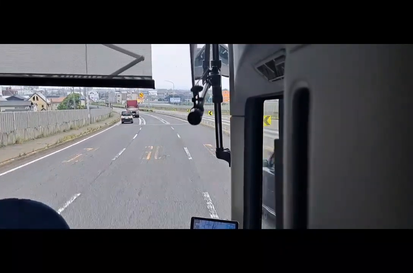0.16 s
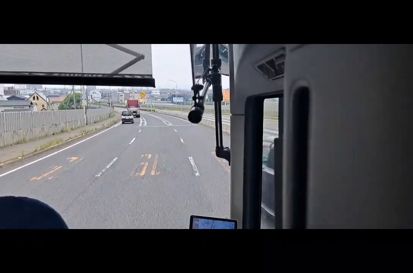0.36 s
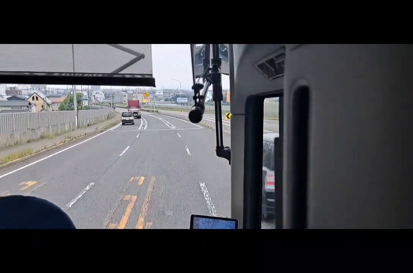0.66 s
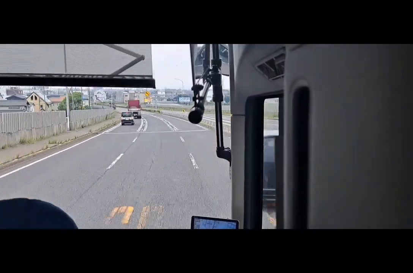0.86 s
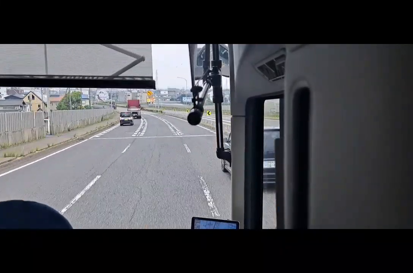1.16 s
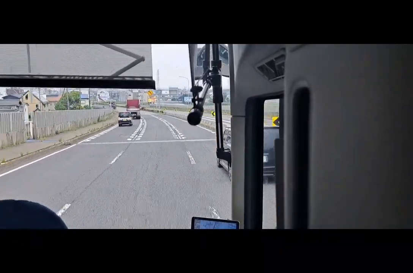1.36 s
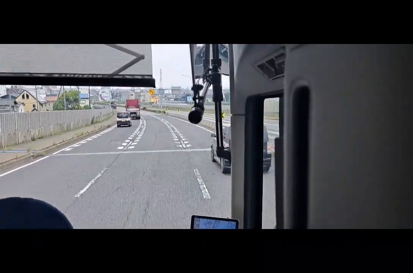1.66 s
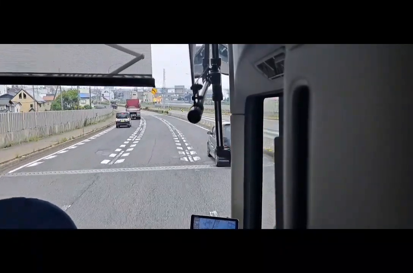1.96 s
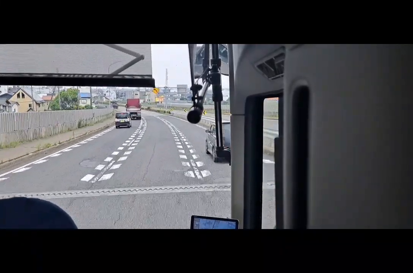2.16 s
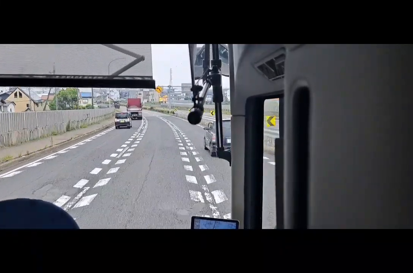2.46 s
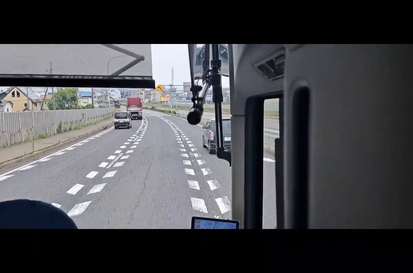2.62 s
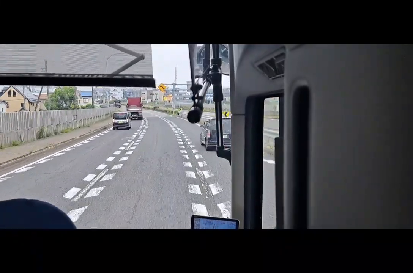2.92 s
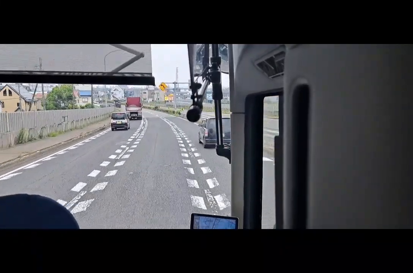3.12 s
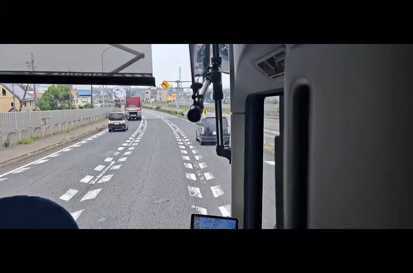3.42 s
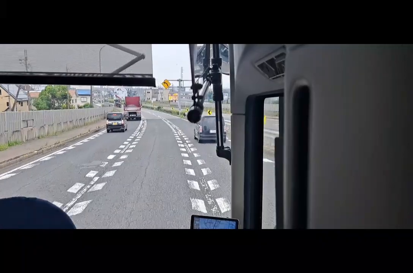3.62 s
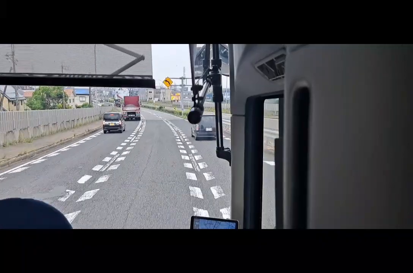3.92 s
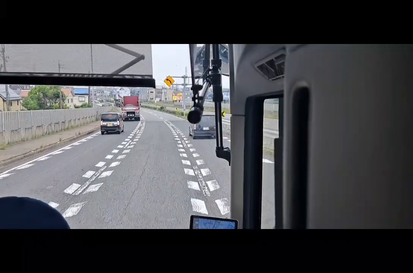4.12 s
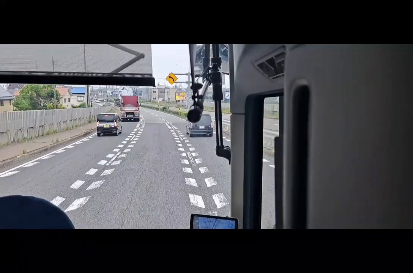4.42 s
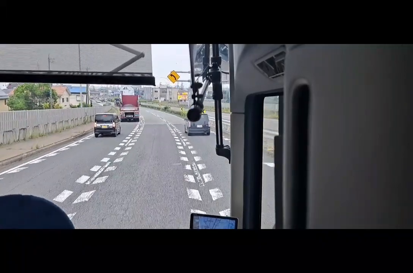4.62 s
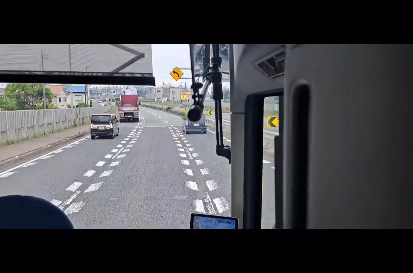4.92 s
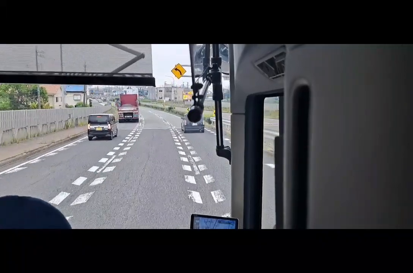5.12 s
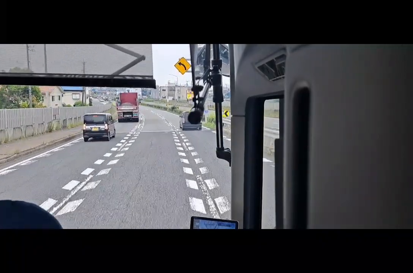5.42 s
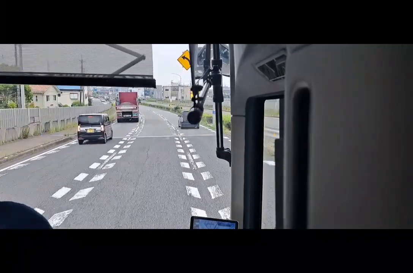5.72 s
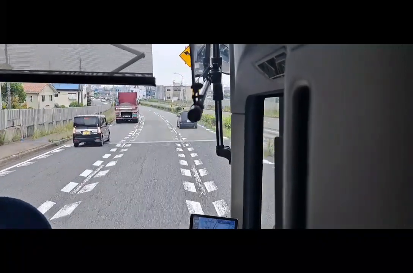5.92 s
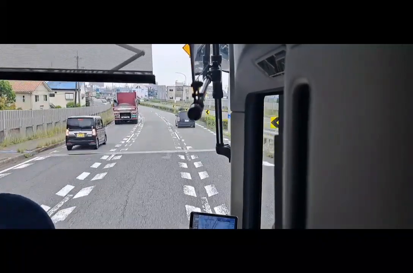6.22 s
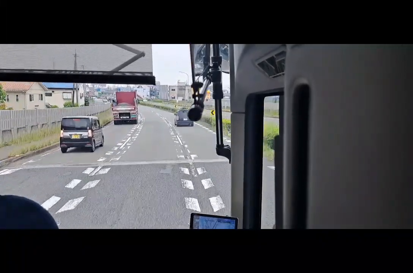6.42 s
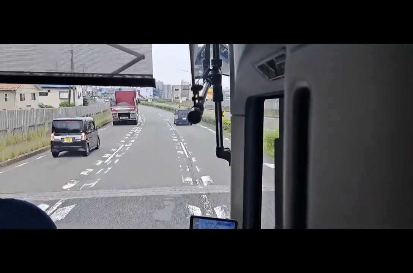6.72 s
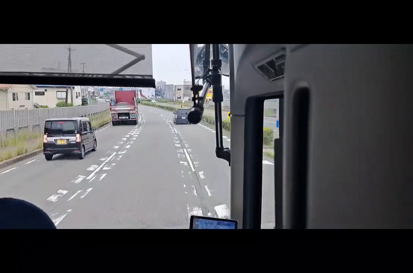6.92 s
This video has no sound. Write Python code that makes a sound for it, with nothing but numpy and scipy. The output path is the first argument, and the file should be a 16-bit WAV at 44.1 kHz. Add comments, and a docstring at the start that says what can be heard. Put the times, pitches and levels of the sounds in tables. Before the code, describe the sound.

A stereo microphone inside a moving coach picks up deep bassy body boom, a distant rear engine and soft tyre noise. Over it, dry plastic trim chatters quickly and irregularly, each swing a gritty rustle with a fluttering squeak. Knocks cluster early, just after three seconds and again after five. The chatter nearly rests in between, and brief thin rubber chirps appear in the second half.

```python
"""Coach cabin from a front seat

Stereo microphone in a front seat as a coach cruises along a main road, the diesel low at the far rear.
Engine and body notes are wavering sines; tyres, vents and body resonances are shaped noise.
Loose trim rocks about ten times a second, some swings harder than others: every swing rustles
in grains of noise and rubs with a fluttering squeak. Knocks and ticks are struck modes that die away;
now and then a rubber seal chirps, an unsteady tone with its octave."""
import sys
import numpy as np
from scipy import signal
from scipy.fft import rfft, irfft, next_fast_len
from scipy.io import wavfile
from scipy.ndimage import uniform_filter1d

SR = 44100
rng = np.random.default_rng(int(sys.argv[2]) if len(sys.argv) > 2 else 0)


def file_out(sig):
    """Save sig as 16-bit WAV at sys.argv[1]."""
    # one column per channel
    cols = np.atleast_2d(sig).T
    # limit, then scale
    lim = np.clip(cols, -1, 1)
    pcm = np.round(lim * 32767).astype(np.int16)
    wavfile.write(sys.argv[1], SR, pcm)


N = 311787
TIME = np.arange(N) / SR


def from_db(db):
    """Decibels to gain."""
    return 10 ** (np.asarray(db) / 20)


def rms_one(x):
    """Scale to unit power."""
    return x / np.sqrt(np.mean(x ** 2) + 1e-20)


def in_time(rows):
    """Each column of a curve at every sample."""
    seconds, *columns = np.transpose(rows)
    return [np.interp(TIME, seconds, column) for column in columns]


def at_hz(points, hz):
    """Read a spectrum on a log-frequency axis."""
    point_hz, value = np.transpose(points)
    return np.interp(np.log(hz + 1), np.log(point_hz), value)


def pan(left_db):
    """Gains of the two channels; left_db is left minus right, so negative leans right."""
    return from_db(np.array([[left_db], [-left_db]]) / 2)


def drift(rate):
    """Random wander with spread 1, heading for a new value rate times a second."""
    return rms_one(np.interp(TIME * rate, np.arange(16384), rng.standard_normal(16384)))


# Likeness of the two channels in the cabin.
# Each row: frequency in Hz, likeness from -1 (opposed) to 1 (the same).
CHANNEL_LIKENESS = [(60, 0.97), (140, 0.98), (220, 0.87), (330, 0.51), (500, 0.27), (770, 0.47),
                    (1170, -0.24), (1800, -0.28), (2700, 0.11), (6000, 0.00051)]
# Balance of the cabin noise. Each row: frequency in Hz, left minus right in dB.
CHANNEL_BALANCE = [(250, 0), (330, -1), (500, 1), (1100, -1.5), (1750, -9), (2300, 5), (2800, 2), (4000, 0),
                   (5000, -2.5), (7000, -0.5), (10000, 2), (14000, -1.5)]


def cabin_noise(spectrum=None):
    """Stereo noise, nearly alike in both channels in the bass and diffuse in the treble."""
    size = next_fast_len(N)
    hz = np.arange(size // 2 + 1) * SR / size
    mid, side = rfft(rng.standard_normal((2, size)))
    alike = np.clip(at_hz(CHANNEL_LIKENESS, hz), -1, 1)
    ears = np.array([[1], [-1]])
    both = np.sqrt(1 + alike) * mid + np.sqrt(1 - alike) * side * ears
    both = both * from_db(ears * at_hz(CHANNEL_BALANCE, hz) / 2)
    colour = 1 if spectrum is None else from_db(at_hz(spectrum, hz))
    return rms_one(irfft(both * colour, size)[:, :N])


def even_out(sound, even_s):
    """Divide by the running level of both channels together, taken over even_s."""
    power = uniform_filter1d(np.mean(sound ** 2, axis=0), int(even_s * SR) + 1)
    return sound / np.sqrt(power + 1e-20)


def resonate(modes, even_s):
    """Steep resonances driven by noise, their joint level evened over even_s."""
    out, drives = 0, (cabin_noise(), cabin_noise())
    reach = 1.167  # the outer band spans hz / reach to hz * reach
    for k, (hz, width, db) in enumerate(modes):
        band = signal.butter(1, [hz - width / 2, hz + width / 2], "band", fs=SR, output="sos")
        skirt = signal.butter(1, [hz / reach, hz * reach], "band", fs=SR, output="sos")
        out = out + from_db(db) * signal.sosfilt(np.vstack([band, skirt]), drives[k % 2])
    return even_out(out, even_s)


def droning(modes, even_s, steady, wander_hz):
    """Resonances with a share of clean, slowly wandering note on the first mode."""
    note_hz = modes[0][0] + wander_hz * drift(3)
    note = np.sqrt(2) * np.sin(2 * np.pi * (np.cumsum(note_hz) / SR + rng.random()))
    out = np.sqrt(steady) * note + np.sqrt(1 - steady) * resonate(modes, even_s)
    return even_out(out, even_s)


# Low orders of the diesel. Each row: multiple of the firing rate, relative level in dB.
ENGINE_ORDERS = [(2, -35), (2.5, -34), (3, -43.5), (3.5, -42.5), (5, -51.5), (7, -57)]
# Pace of the diesel. Each row: time in seconds, firing rate in Hz before its small jitter.
FIRING_RATE = [(0, 46.84), (2.8, 47.27), (4.6, 46.59), (7.07, 45.11)]
# Drone at the firing rate. Each row: time in seconds, relative level in dB.
DRONE_LEVEL = [(0.0, -26), (0.36, -30), (0.88, -31), (1.84, -34), (2.4, -28), (2.88, -27.5), (3.08, -37),
               (3.77, -30.5), (4.93, -30), (5.13, -21), (6.73, -31.5), (7.07, -29.5)]


def engine(level_db, drone_gain_db, waver_db, jitter):
    """Low orders of the diesel at an easing cruise, wavering as the body flexes."""
    firing_hz = in_time(FIRING_RATE)[0] * (1 + jitter * drift(6))
    turn = 2 * np.pi * np.cumsum(firing_hz) / SR
    orders = np.zeros(N)
    for k, db in ENGINE_ORDERS:
        phase = 2 * np.pi * rng.random()
        orders += from_db(db + waver_db * drift(6.5)) * np.sin(k * turn + phase)
    drone_db = in_time(DRONE_LEVEL)[0] + drone_gain_db + waver_db * drift(7)
    return np.sqrt(2) * (from_db(level_db) * orders + from_db(drone_db) * np.sin(turn))


# The road surface. Each row: time in seconds, wheel shudder in dB, relative tyre roar in dB.
SURFACE = [(0, -56, -37.5), (.7, -37, -35), (1.2, -42, -40), (2, -53, -37.5), (2.2, -28, -35.5),
           (2.5, -37, -36), (3.1, -35, -36), (3.35, -24.5, -35.5), (3.55, -27, -38), (3.8, -51, -42),
           (4.8, -46, -43), (5, -39, -41), (5.15, -32, -36), (5.5, -42, -36.5), (5.85, -32, -36),
           (6.35, -40, -37.5), (7.07, -36, -39)]
# Wheels on their springs, then the body and its large, middle and small panels.
# Each row: resonance in Hz, width in Hz, relative level in dB.
SHUDDER_MODES = [(25.2, 7.2, 0)]
BODY_MODES = [(58.9, 6.1, 1), (66.2, 6.3, -14)]
LARGE_PANELS = [(95.76, 7.7, 0)]
MIDDLE_PANELS = [(114.86, 6.9, 0)]
SMALL_PANELS = [(135.9, 11, 1), (148.7, 11.7, 0), (237, 32, -14.5)]
# How hard the road drives the body and each set of panels.
# Each row: time in seconds, relative level in dB.
BOOM = [(0.0, -22.5), (0.16, -28), (0.32, -16), (0.68, -20.5), (0.8, -19.5), (0.88, -29), (1.28, -27),
        (2.24, -23), (2.68, -28), (3.04, -19.5), (3.36, -23), (3.48, -32), (4.69, -30.5), (6.05, -31.5),
        (6.25, -25.5), (6.69, -30.5), (7.07, -40)]
LARGE_DRUMMING = [(0.0, -28), (0.4, -24.5), (0.52, -31), (0.72, -24), (1.24, -32.5), (2.12, -29.5),
                  (2.48, -24.5), (2.96, -25), (3.81, -37.5), (5.17, -33), (5.33, -21.5), (6.05, -27.5),
                  (7.07, -29)]
MIDDLE_DRUMMING = [(0.0, -29.5), (0.36, -22), (0.96, -31), (2.04, -32), (2.28, -27), (2.4, -44),
                   (2.56, -16.5), (2.68, -28.5), (3.16, -23.5), (3.36, -36), (4.21, -32), (4.69, -37.5),
                   (5.13, -28), (5.41, -26.5), (5.77, -16), (6.17, -37), (7.07, -29)]
SMALL_DRUMMING = [(0.0, -26.5), (0.838, -32), (0.92, -34.5), (1.32, -28.5), (1.96, -35), (2.16, -26.5),
                  (3.28, -26.5), (3.4, -35), (5.01, -37), (5.17, -23), (5.37, -28.5), (6.13, -26.5),
                  (6.49, -31), (7.07, -31.5)]
# Spectrum of the tread's roar. Each row: frequency in Hz, relative density in dB per Hz.
TYRES = [(30, 0), (120, 7), (160, 0.5), (176, 3.5), (235, 6), (272, -2.5), (320, 3.5), (395, -2.5),
         (435, -1.5), (510, -6.5), (630, -6.5), (900, -13.5), (1300, -17.5), (2200, -26), (3200, -37),
         (14000, -56)]


def road(boom_gain_db, drum_gain_db, roar_gain_db, flutter_db, surge_db):
    """The road drives wheels, body and panels, each swelling in its own time; the tread roars above."""
    shudder_db, roar_db = in_time(SURFACE)
    shudder = from_db(shudder_db) * resonate(SHUDDER_MODES, even_s=0.18)
    boom_db = in_time(BOOM)[0] + boom_gain_db + surge_db * drift(11.0)
    boom = from_db(boom_db) * droning(BODY_MODES, even_s=0.11, steady=0.39, wander_hz=1.46)
    panels = (
        (droning(LARGE_PANELS, even_s=0.073, steady=0.36, wander_hz=1.8), LARGE_DRUMMING),
        (droning(MIDDLE_PANELS, even_s=0.09, steady=0.58, wander_hz=1.627), MIDDLE_DRUMMING),
        (resonate(SMALL_PANELS, even_s=0.078), SMALL_DRUMMING))
    drum = 0
    for sound, curve in panels:
        drum = drum + from_db(in_time(curve)[0] + drum_gain_db + surge_db * drift(14)) * sound
    roar = from_db(roar_db + roar_gain_db + flutter_db * drift(40)) * cabin_noise(TYRES)
    return (shudder + boom + roar) * pan(-1.0) + drum


# Spectrum of the ventilation. Each row: frequency in Hz, relative density in dB per Hz.
VENTS = [(300, 9), (900, 9.5), (1250, 5.5), (1500, 8.5), (1800, 3), (2200, -16.5), (2900, -26.5),
         (5000, -24), (12000, -43)]


def ventilation(level_db):
    """Steady hiss of moving air, well over to the right."""
    return from_db(level_db) * cabin_noise(VENTS) * pan(-9.0)


def slides(strokes, rise_s, stall_db, bite_db):
    """Each swing takes hold, slides and stalls ever faster, until the next takes over."""
    swing_s = 0.11  # age at which the swing has lost stall_db
    envelope = np.zeros(N)
    for s, db in strokes:
        span = slice(int(s * SR), int(s * SR) + SR // 3)
        age = np.maximum(TIME[span] - s, 0)
        bite = bite_db * np.exp(-age / 0.012)  # the first grip is the hardest
        slide_db = db + bite - stall_db * (age / swing_s) ** 2
        slide = from_db(slide_db) * (1 - np.exp(-age / rise_s))
        envelope[span] = np.maximum(envelope[span], slide)
    return envelope


# Swings of the loose trim, shared by its rustle, rubs and light contacts.
# Each row: start in seconds, then relative levels in dB of the rustle, its crisp top and the squeak.
SWINGS = [(0.111, -46.5, -48.5, -44), (0.228, -44.5, -52.5, -41.5), (0.304, -45.5, -50.5, -43),
          (0.418, -44, -54, -37.5), (0.516, -50, -54, -51), (0.572, -49, -49, -49.5),
          (0.615, -46, -47.5, -41), (0.692, -46.5, -49, -47), (0.796, -43.5, -45, -47),
          (0.895, -49, -49.5, -53), (0.992, -48.0, -49, -41), (1.081, -48.0, -49, -44.5),
          (1.185, -44.0, -45.5, -37.0), (1.276, -47.5, -51.0, -41.5), (1.378, -47, -47.5, -44.5),
          (1.465, -49.5, -51.5, -38.5), (1.553, -45, -49.0, -43.5), (1.648, -48, -52.0, -48.5),
          (1.746, -49.5, -52.0, -41.0), (1.845, -50.5, -52.0, -51.5), (1.932, -52.5, -51.5, -48.5),
          (2.034, -49, -48.5, -46.5), (2.133, -43.5, -45, -46.5), (2.243, -46.0, -47, -46),
          (2.329, -46.5, -49.5, -47.5), (2.478, -49, -53.0, -45), (2.53, -45.0, -44.5, -47.0),
          (2.563, -47.5, -49, -47), (2.716, -48, -53, -50.5), (2.805, -47.5, -54, -46.5),
          (2.9, -46.5, -50.5, -39.5), (2.988, -44.5, -52.5, -44.0), (3.089, -47.5, -54, -39.5),
          (3.15, -47, -51, -42.0), (3.187, -41.5, -43.5, -41), (3.281, -45, -47, -42.0),
          (3.378, -46, -49, -47), (3.5, -45, -52, -48), (3.585, -49.5, -52, -54.5),
          (3.675, -49.5, -52, -43.0), (3.784, -49.0, -54.0, -47), (3.899, -50.5, -51, -52),
          (3.972, -50.0, -51, -48.5), (4.07, -52, -55.0, -47.5), (4.215, -54.5, -54.5, -63.5),
          (4.32, -53, -56.5, -60), (4.454, -59, -61, -57.5), (4.63, -56.5, -63, -64),
          (4.705, -63, -75.0, -69), (4.885, -57, -65.5, -65.5), (4.925, -54.5, -62, -61),
          (4.986, -52.5, -64, -44.5), (5.075, -52, -60.0, -58.5), (5.166, -49, -56.5, -39.5),
          (5.268, -48.5, -57, -40.5), (5.333, -50.5, -58, -39.5), (5.388, -46.5, -52, -57.5),
          (5.451, -52.5, -61, -40), (5.525, -51.5, -60, -51), (5.67, -50.5, -60.0, -52.5),
          (5.76, -48.5, -56, -68), (5.837, -48, -54, -42), (5.919, -44.5, -49.5, -41),
          (6.015, -47.5, -50, -49.5), (6.107, -43.5, -50, -35.0), (6.2, -44.5, -49.0, -37.5),
          (6.307, -41.5, -44.5, -40.0), (6.411, -47, -49, -52.5), (6.497, -45.5, -47.5, -40.5),
          (6.59, -46.0, -47.5, -45.5), (6.68, -45.5, -46.5, -51), (6.775, -51.5, -56.5, -63),
          (6.862, -51, -56.5, -44), (6.94, -49, -55, -47.5)]
# Spectrum of the rustle. Each row: frequency in Hz, relative density in dB per Hz.
RUSTLE = [(400, -3), (900, 12), (1380, 12.5), (1700, 16.5), (1950, 10), (2400, 4), (3100, 0.5), (4300, -1),
          (4900, 1.5), (6100, -4.5), (7500, -2.5), (9200, -6.5), (15500, -9.5)]
# Narrow peaks in the rustle's spectrum. Each row: centre in Hz, width in Hz, relative level in dB.
RUSTLE_PEAKS = [(2936, 31, -4), (4760, 120, -6.5), (7300, 110, -6.5)]


def rustle(swings, level_db, grain_db, grit_db, split_hz, rest_db):
    """Gritty grains of sliding trim with narrow peaks; both parts start sharply, the top slightly faster."""
    grains = cabin_noise(RUSTLE) * from_db(grain_db * drift(160) + grit_db * drift(1300))
    peaks = 0
    for hz, width, db in RUSTLE_PEAKS:
        b, a = signal.iirpeak(hz, hz / width, fs=SR)
        peaks = peaks + from_db(db) * signal.lfilter(b, a, grains)
    grains = grains + peaks
    dull = signal.sosfilt(signal.butter(5, split_hz, "low", fs=SR, output="sos"), grains)
    top = signal.sosfilt(signal.butter(5, split_hz, "high", fs=SR, output="sos"), grains)
    # a fainter rustle carries on between the swings
    resting = from_db(np.interp(TIME, swings[:, 0], swings[:, 1]) + rest_db)
    sliding = slides(swings[:, [0, 1]], rise_s=0.002, stall_db=12.0, bite_db=4.0)
    dull = dull * np.hypot(sliding, resting)
    top = top * slides(swings[:, [0, 2]], rise_s=0.0007, stall_db=10.5, bite_db=5.5)
    return from_db(level_db) * (dull + top) * pan(-1.8)


def swell(s, swell_s, fade_s):
    """A brief rise and fall of pressure around a moment: its samples and its envelope."""
    near = slice(max(int(s * SR) - SR // 8, 0), int(s * SR) + SR // 8)
    age = TIME[near] - s
    return near, 1 / np.cosh(age / np.where(age < 0, swell_s, fade_s)) ** 2


# Resonances that ring with the squeak, then those of the broader rasp.
# Each row: resonance in Hz, width in Hz, relative level in dB.
SQUEAK_MODES = [(1596, 57, -2), (1710, 120, -4.5), (622, 45, 0.5), (1405, 59, -9), (2320, 110, -12.5),
                (2950, 49, -16.5), (4775, 150, -19.5)]
RASP_MODES = [(1194, 45, 10), (1104, 130, 4.5), (1364, 41, 1.5), (1690, 60, -11), (780, 1500, -8)]
# A few swings catch and scrape harshly. Each row: time in seconds, relative level in dB.
SCRAPES = [(.122, -30.5), (.32, -39), (.625, -36), (.812, -27.5), (1.397, -35.5), (2.578, -34.5),
           (6.512, -37)]


def rubs(swings, note_db, panel_db, squeak_gain_db, rasp_gain_db, scrape_gain_db,
         swell_s, fade_s, wobble, flutter_db):
    """Stick and slip: a fluttering squeak, higher when light, over a panel's low note and a rasp."""
    squeak_hz, full_db, rise_hz_per_db = 1608, -35, 2.5  # the note at full_db, and its rise below that
    panel_hz, rub_lag_s = 626, 0.017  # the rub peaks this long after its swing starts
    detune = 0.00693 * rng.standard_normal(size=128)  # share of the pitch, from rub to rub
    unsteady = 1 + wobble * drift(120)
    flutter = rms_one(from_db(flutter_db * drift(110)))
    note, low_note, squeak = np.zeros((3, N))
    for (s, _, _, db), off in zip(swings, detune):
        near, stroke = swell(s + rub_lag_s, swell_s, fade_s)
        turn = 2 * np.pi * np.cumsum(unsteady[near] + off) / SR  # phase per Hz of pitch
        note_hz = squeak_hz + rise_hz_per_db * (full_db - db)
        note[near] += from_db(db + note_db) * stroke * np.sin(note_hz * turn)
        low_note[near] += from_db(db + panel_db) * stroke * np.sin(panel_hz * turn)
        squeak[near] += from_db(db) * stroke
    rasp = from_db(rasp_gain_db) * squeak
    for s, db in SCRAPES:
        near, stroke = swell(s, swell_s, fade_s)
        rasp[near] += from_db(db + scrape_gain_db) * stroke
    ringing = from_db(squeak_gain_db) * squeak * resonate(SQUEAK_MODES, even_s=0.03) * pan(-1.7)
    rasping = rasp * resonate(RASP_MODES, even_s=0.022) * pan(-1.3)
    return flutter * (note * pan(-8.5) + ringing) + low_note + rasping


def chatter(swings, above_db, scatter_db, within_s):
    """A light contact somewhere in each swing, its strength left to chance: rows of seconds, dB."""
    chance = rng.random(size=(128, 2))
    contacts_made = []
    for (s, db, *_), (late, hard) in zip(swings, chance):
        moment = min(s + within_s * late, TIME[-1])
        contacts_made.append((moment, db + above_db + scatter_db * (2 * hard - 1)))
    return contacts_made


def strike(events, modes, scatter_db):
    """Every blow rings each decaying mode with a strength of its own."""
    s, blow_db = np.transpose(events)
    chance, out = rng.standard_normal((len(s), len(modes))), np.zeros(N)
    for k, (hz, db, t60) in enumerate(modes):
        clicks = np.full(N, 1e-18)
        clicks[(s * SR).astype(int)] = from_db(blow_db + db + scatter_db * chance[:, k])
        r, w = from_db(-60 / (t60 * SR)), 2 * np.pi * hz / SR  # decay and turn per sample
        out += signal.lfilter([0, np.sin(w)], [1, -2 * r * np.cos(w), r * r], clicks)
    return out


# Hard knocks of a loose fitting, then sharp plastic ticks.
# Each row: time in seconds, relative level in dB.
KNOCKS = [(.32, -24), (.357, -28), (.626, -27), (.676, -30), (.739, -23.5), (.819, -26.5), (.919, -29),
          (1.01, -26), (1.087, -32), (1.14, -34), (1.655, -30), (1.70, -31), (1.844, -28.5), (1.942, -30),
          (3.165, -24), (3.255, -19.5), (3.292, -19.5), (3.465, -22.5), (3.537, -29.5), (3.624, -19),
          (3.709, -27), (4.673, -33), (5.09, -21), (5.173, -25), (5.865, -28.5), (5.957, -25.5),
          (6.051, -27.5), (6.112, -26), (6.287, -25), (6.357, -23.5)]
TICKS = [(.24, -41), (.3067, -43), (2.7357, -40), (3.1654, -46), (3.2554, -41.5), (3.2925, -39.5),
         (3.465, -44), (3.6239, -37), (4.0969, -46), (5.0905, -45), (5.5466, -43.5), (5.5713, -43.5),
         (5.7825, -47), (5.8351, -40), (5.8437, -41), (5.868, -44), (6.249, -40)]
# Modes of the knocks and of the ticks.
# Each row: frequency in Hz, relative level in dB, time to fall 60 dB in seconds.
KNOCK_MODES = [(248, -2.5, 0.012), (319, 3, 0.048), (389, 0, 0.019), (527, -9, 0.016)]
TICK_MODES = [(1750, -10, 0.0049), (3480, 3, 0.0016), (5840, 4.5, 0.0067), (7340, 0, 0.0029),
              (11800, -14.5, .001)]


def contacts(swings, knock_db, tick_db, lag_s, padding_hz):
    """Padding dulls the knocks; the sharp ticks reach the left ear first."""
    light_knocks = chatter(swings, above_db=9.0, scatter_db=4.5, within_s=0.06)
    light_ticks = chatter(swings, above_db=-5.5, scatter_db=1.5, within_s=0.03)
    knocks = from_db(knock_db) * strike(list(KNOCKS) + light_knocks, KNOCK_MODES, scatter_db=1.0)
    knocks = signal.sosfilt(signal.butter(2, padding_hz, fs=SR, output="sos"), knocks)
    ticks = from_db(tick_db) * strike(list(TICKS) + light_ticks, TICK_MODES, scatter_db=0.5)
    late_ticks = np.interp(TIME - lag_s, TIME, ticks)
    return knocks * pan(-4.0) + np.array([ticks, late_ticks]) * pan(-1.0)


# Thin chirps of a rubber seal. Each row: time in seconds, mean pitch in Hz, relative level in dB.
CHIRPS = [(3.385, 2530, -45.5), (5.251, 2600, -51), (5.648, 2570, -53), (6.39, 2570, -50)]


def chirps(level_db, length_s, wobble, octave_db):
    """A seal slips briefly: an unsteady tone with its octave."""
    out, unsteady = np.zeros(N), 1 + wobble * drift(230)
    for s, hz, db in CHIRPS:
        near = slice(int(s * SR) - SR // 8, int(s * SR) + SR // 8)
        turn = 2 * np.pi * np.cumsum(hz * unsteady[near]) / SR
        envelope = from_db(db + level_db) * np.exp(-((TIME[near] - s) / length_s) ** 2)
        out[near] += envelope * (np.sin(turn) + from_db(octave_db) * np.sin(2 * turn))
    return out * pan(2.5)


def scene():
    """Engine, road and ventilation fill the cabin; the trim chatters on top."""
    drone = engine(level_db=-5.0, drone_gain_db=-1.5, waver_db=4.5, jitter=0.0063)
    rumble = road(boom_gain_db=1.37, drum_gain_db=0.34, roar_gain_db=4.5, flutter_db=1.0, surge_db=2.0)
    vents = ventilation(level_db=-58.0)
    swings = np.array(SWINGS)
    trim = rustle(swings, level_db=2.0, grain_db=1.5, grit_db=1.5, split_hz=7870, rest_db=-6.5)
    squeaks = rubs(swings, note_db=0.9, panel_db=-3.5, squeak_gain_db=-0.5, rasp_gain_db=-4.5,
                   scrape_gain_db=-8.0, swell_s=0.014, fade_s=0.018, wobble=0.0096, flutter_db=3.5)
    blows = contacts(swings, knock_db=-0.5, tick_db=5.5, lag_s=0.000434, padding_hz=810)
    seal = chirps(level_db=-2.5, length_s=0.023, wobble=0.021, octave_db=-10.0)
    return drone + rumble + vents + trim + squeaks + blows + seal


def record(dry):
    """The microphone drops the deepest bass; the top is cut steeply at 15750 Hz."""
    thin = signal.sosfilt(signal.butter(2, 17, "high", fs=SR, output="sos"), dry)
    return signal.sosfilt(signal.ellip(10, 0.2, 80, 15750, fs=SR, output="sos"), thin)


dry = scene()
out = record(dry)
file_out(out)
```